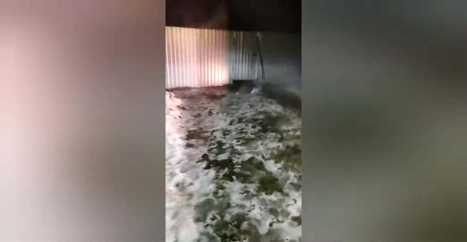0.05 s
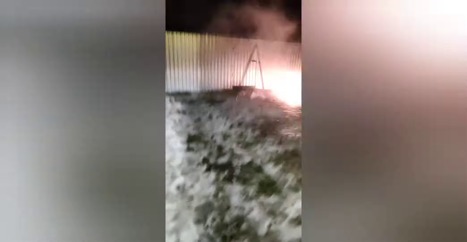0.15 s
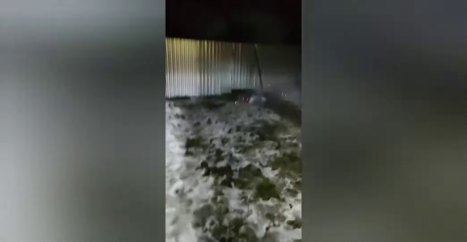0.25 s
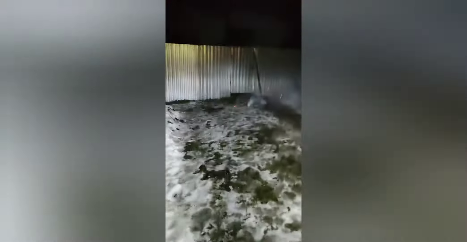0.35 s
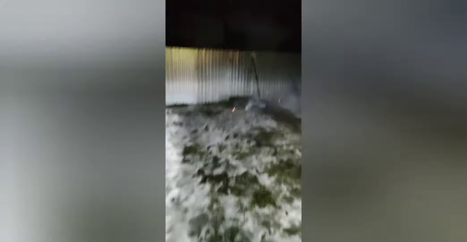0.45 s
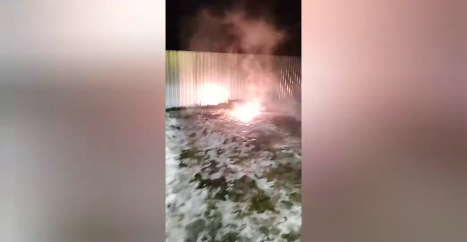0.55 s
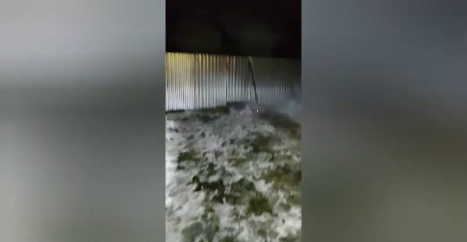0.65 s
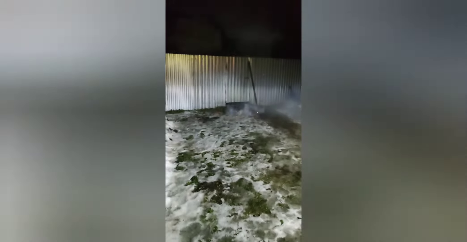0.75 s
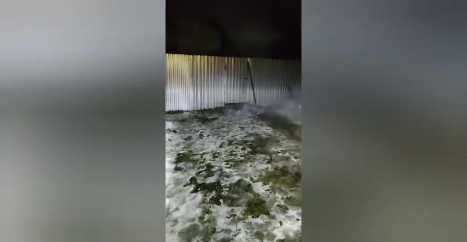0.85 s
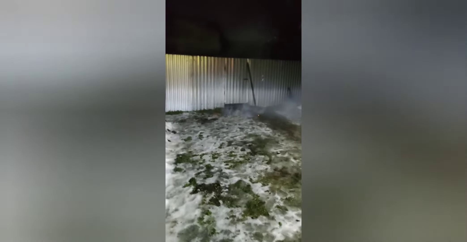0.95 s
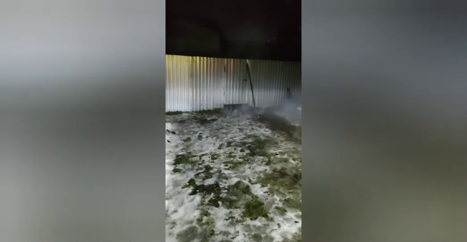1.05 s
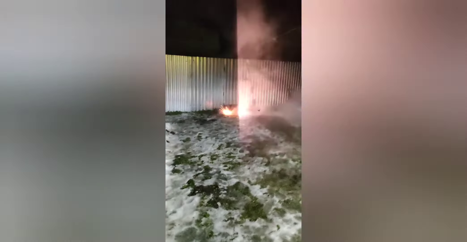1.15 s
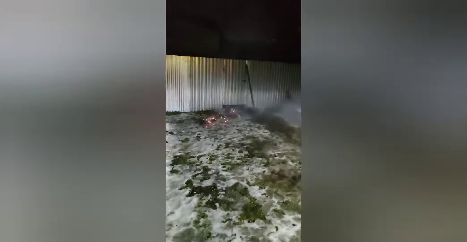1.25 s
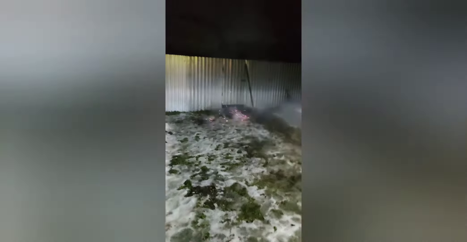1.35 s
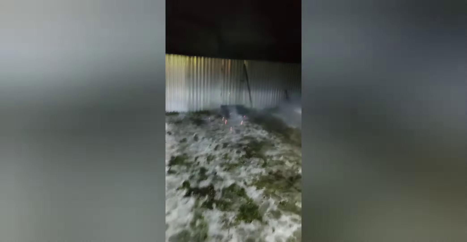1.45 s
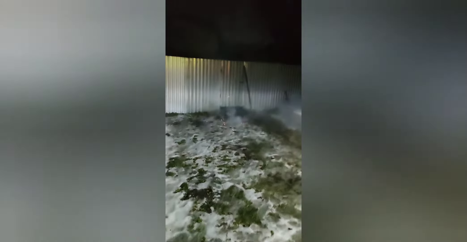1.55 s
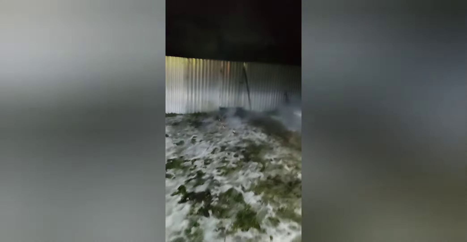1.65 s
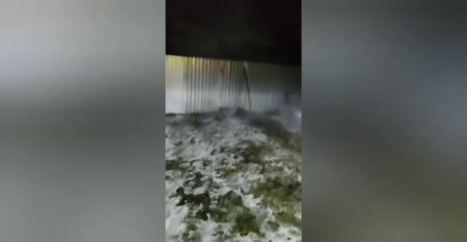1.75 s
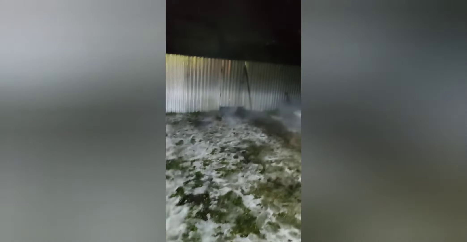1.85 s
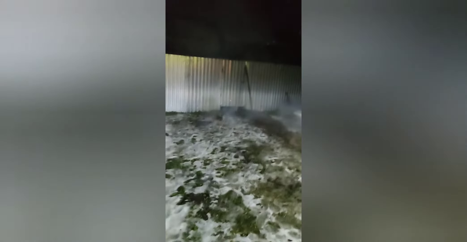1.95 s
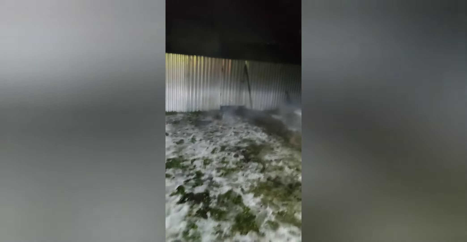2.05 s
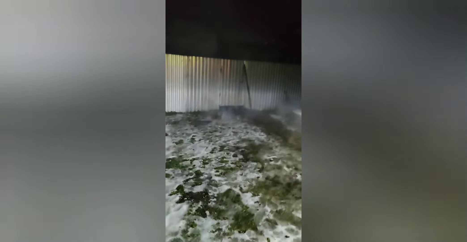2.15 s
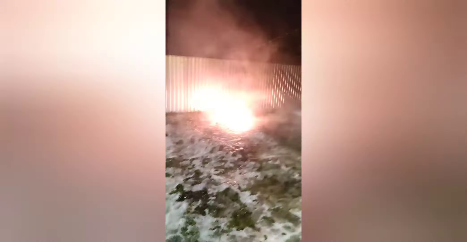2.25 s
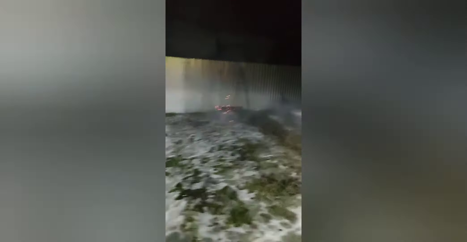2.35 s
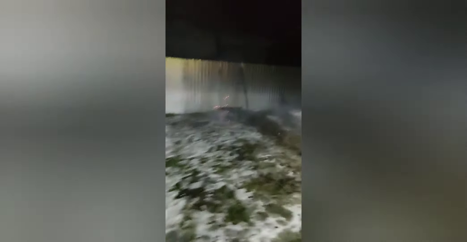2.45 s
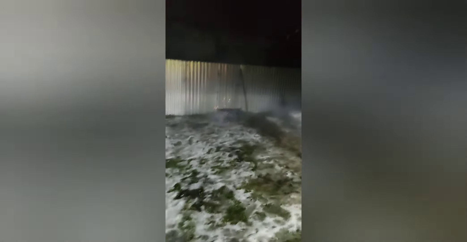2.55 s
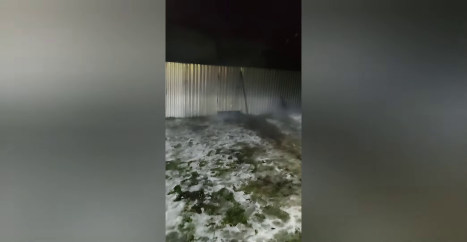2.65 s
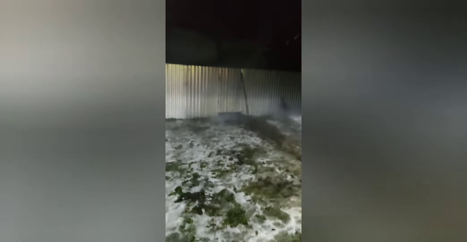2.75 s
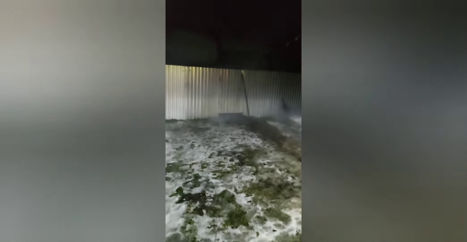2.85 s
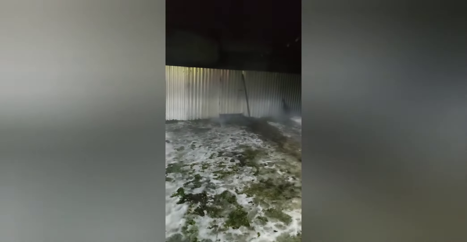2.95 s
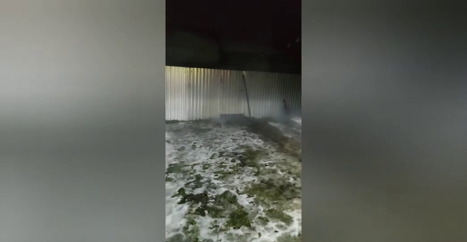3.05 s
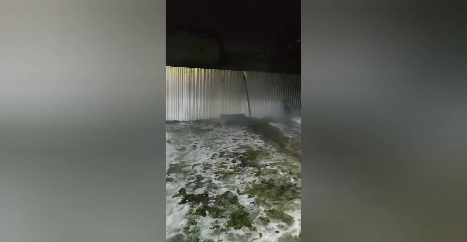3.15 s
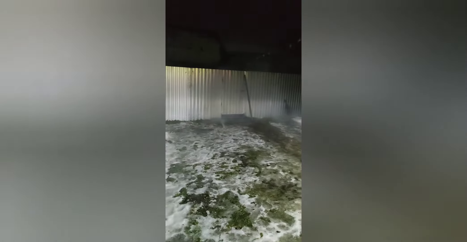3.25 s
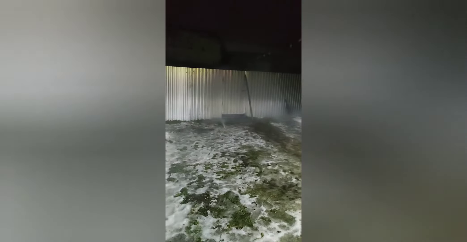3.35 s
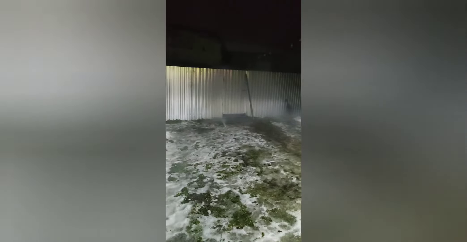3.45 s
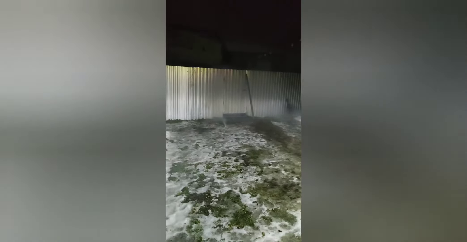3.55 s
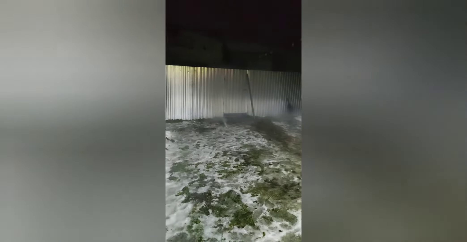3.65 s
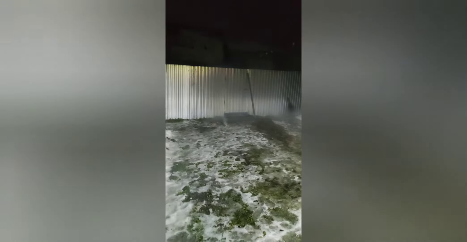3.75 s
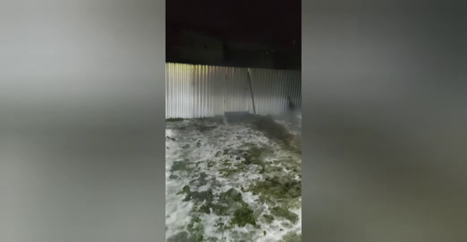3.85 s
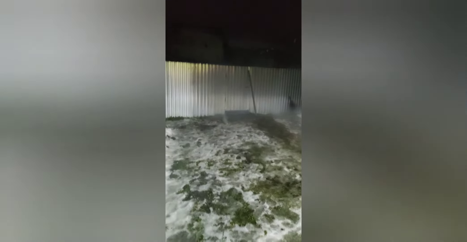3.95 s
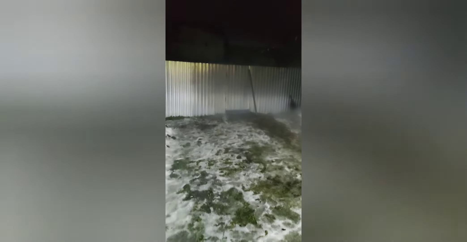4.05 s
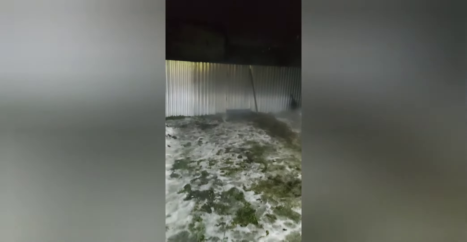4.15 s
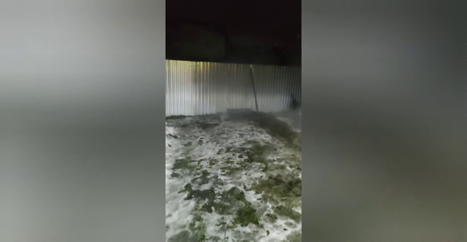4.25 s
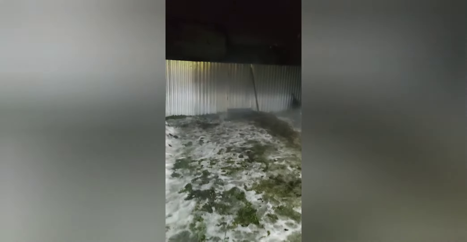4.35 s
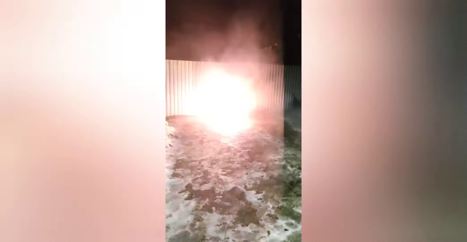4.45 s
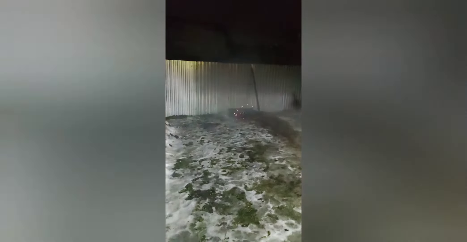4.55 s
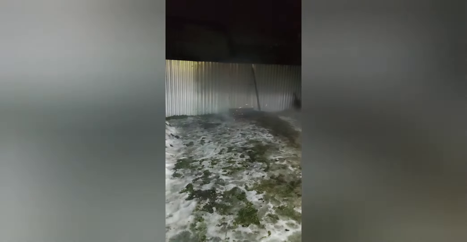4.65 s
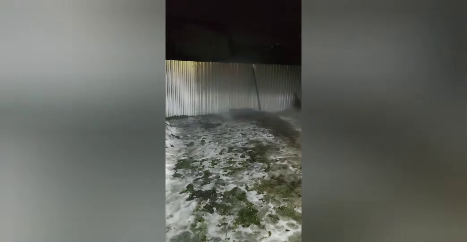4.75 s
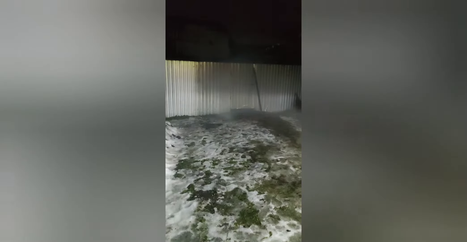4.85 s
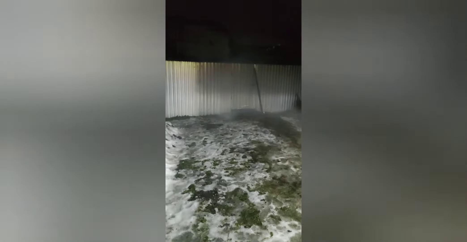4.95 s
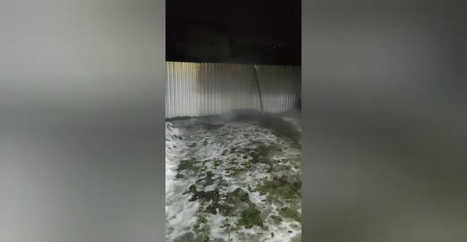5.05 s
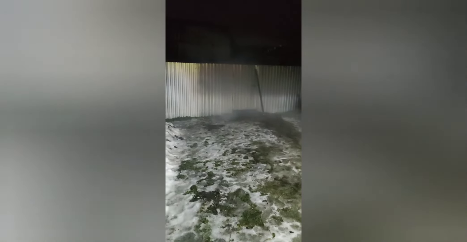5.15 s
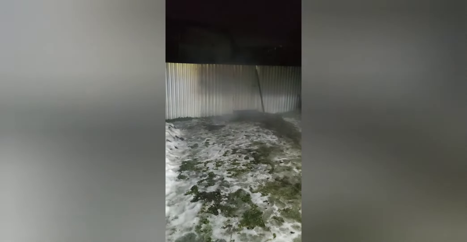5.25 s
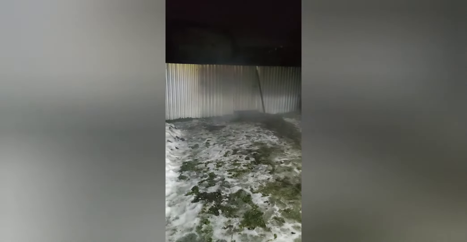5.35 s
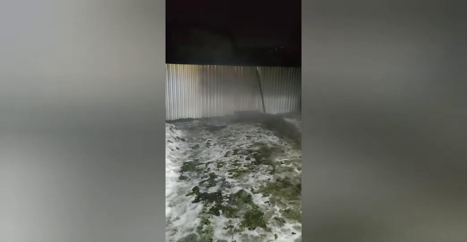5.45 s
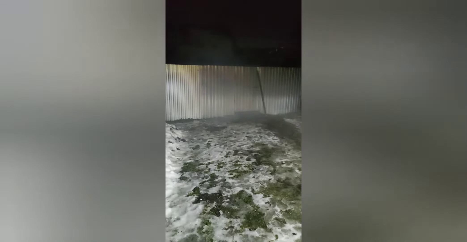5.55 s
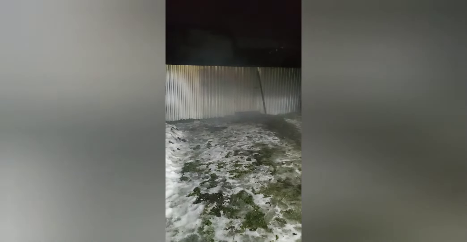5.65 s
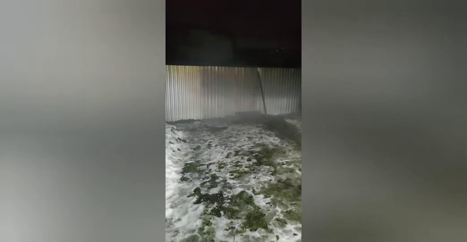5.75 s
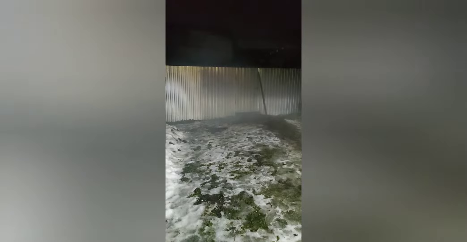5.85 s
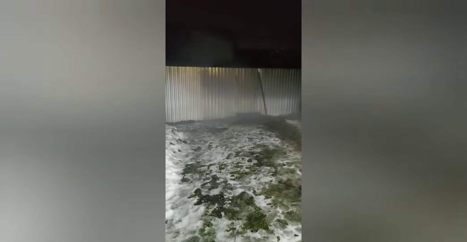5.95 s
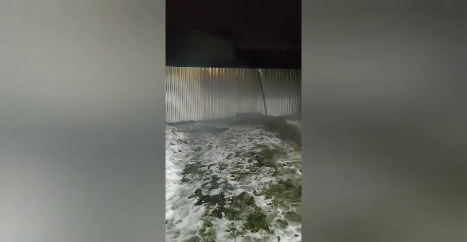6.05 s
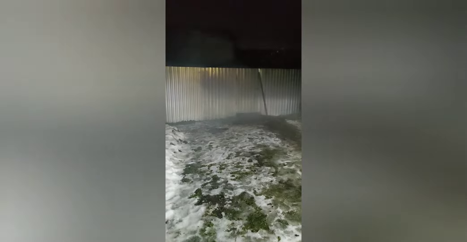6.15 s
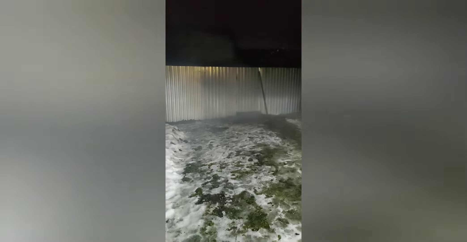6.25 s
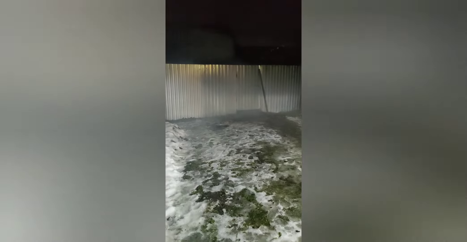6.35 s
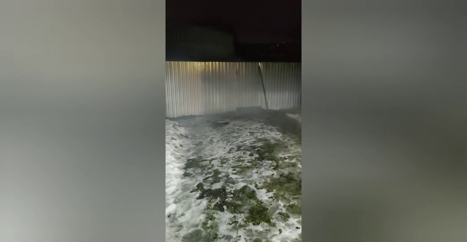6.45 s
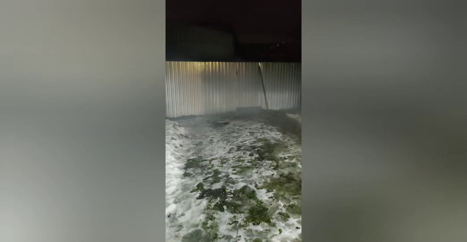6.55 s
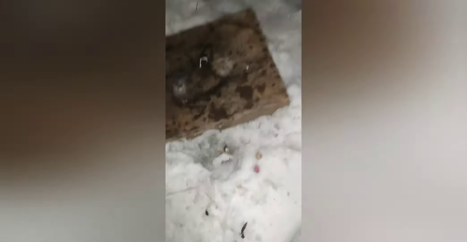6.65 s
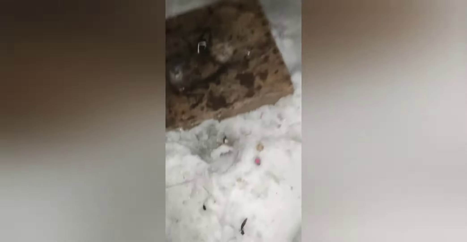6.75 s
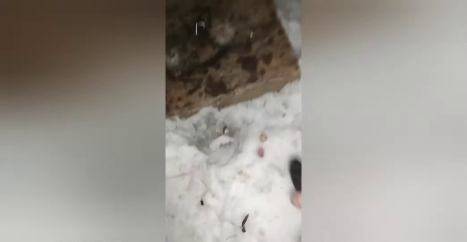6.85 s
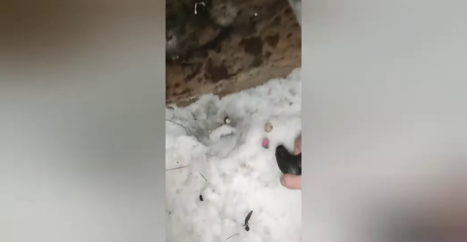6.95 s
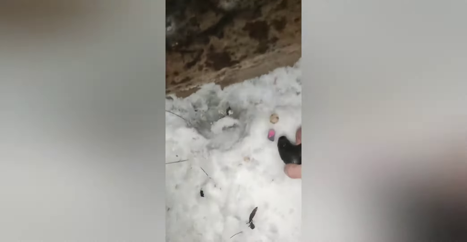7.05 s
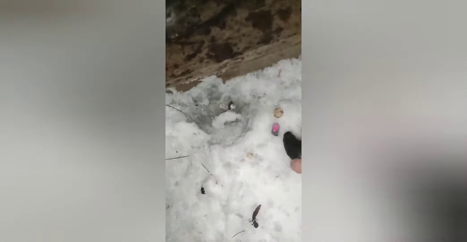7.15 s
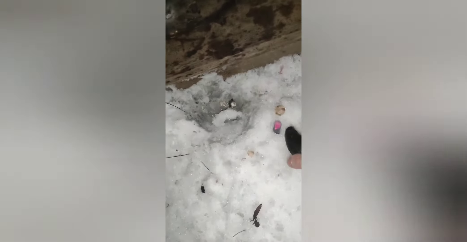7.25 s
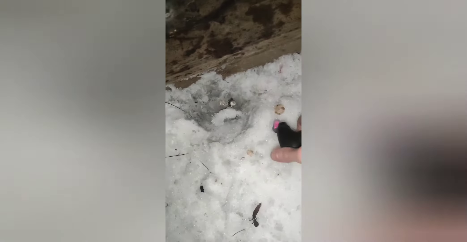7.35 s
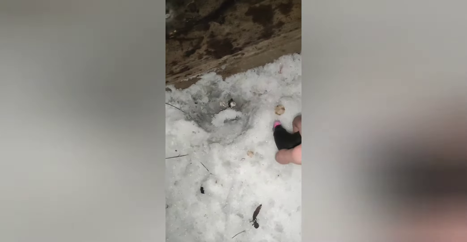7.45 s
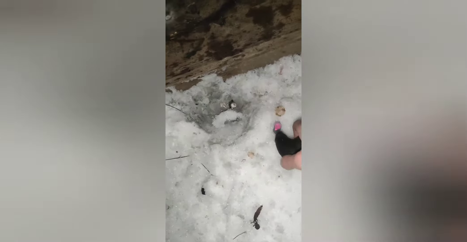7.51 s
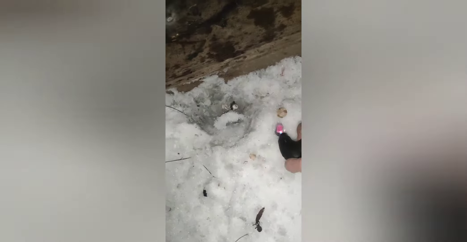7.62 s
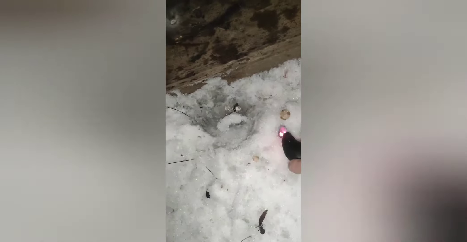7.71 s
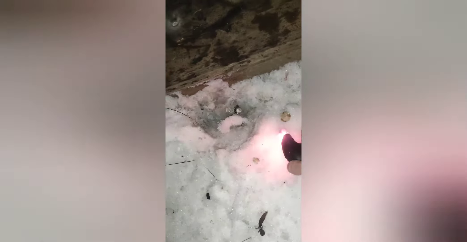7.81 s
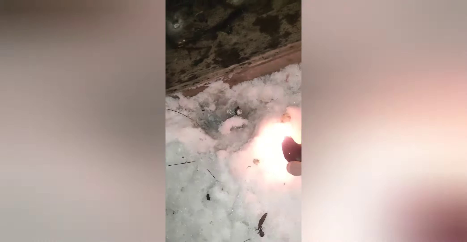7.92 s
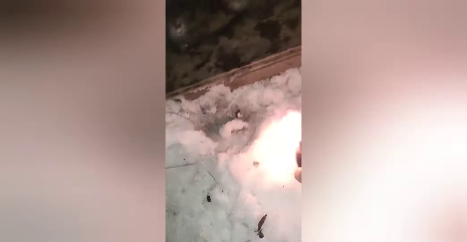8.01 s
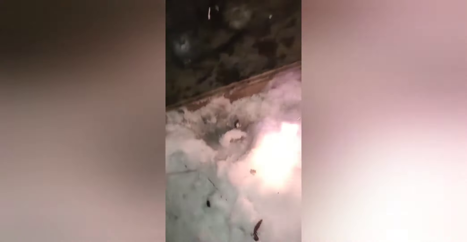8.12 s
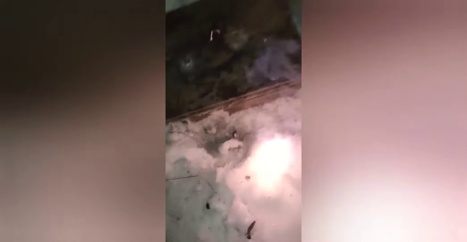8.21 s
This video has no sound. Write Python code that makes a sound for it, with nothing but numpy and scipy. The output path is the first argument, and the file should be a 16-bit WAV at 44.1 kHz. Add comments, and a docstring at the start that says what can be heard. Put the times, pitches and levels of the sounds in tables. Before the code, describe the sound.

Hard, clipped bangs come in a flurry, followed by one more and then another after a pause, with quick metallic reflections and a dull fading outdoor roll. Between them are quiet night air, grainy snow crunches and low wind buffeting. The scene switches suddenly to something close: soft rustling, a rattling lighter click, tiny finger taps, another click, then a steady sputtering hiss.

```python
"""Firecrackers go off in a snowy yard: shock waves crack, return from a metal fence, then from walls and far
houses, and roll away. Around the bangs snow crunches and air buffets the microphone, all of it noise bursts.
The yard then gives way to close air with a soft rustle. A lighter snaps in rattling noise, fingers tap, it
snaps again, its flame hisses louder until it holds steady, and a fuse catches, spitting in grainy bursts."""
import sys
import numpy as np
from scipy import signal
from scipy.fft import rfft, irfft, next_fast_len
from scipy.io import wavfile
from scipy.ndimage import uniform_filter1d, minimum_filter1d

SR = 44100
rng = np.random.default_rng(int(sys.argv[2]) if len(sys.argv) > 2 else 0)


def master(y):
    """Save y as 16-bit WAV."""
    cut = np.clip(np.atleast_2d(y).T, -1, 1)
    pcm = np.round(cut * 32767)  # scale
    wavfile.write(sys.argv[1], SR, pcm.astype(np.int16))


N = 365148
TIME = np.arange(N) / SR

# In every table of events, a rise is the time to swell by a factor e and t60 the time to die by 60 dB.
# Bangs: (time [s], charge [dB], crack [dB], openness of the spot [dB], fence echo lag [s],
#         near wall echo lag [s], houses' echo lag [s], pressure heave [dB], wall slaps [dB])
BANGS = [(0.127, -1, -6.5, -10.5, 0.0081, .138, .205, -47, -16),
         (0.2191, 0.5, -6, -10.5, 0.0074, .101, 0.23, -16.5, -11),
         (0.6048, 0, -2, -2, 0.0073, 0.12, 0.24, -29, 0.5),
         (1.1974, -1, -3, -3, .0045, .112, .25, -31, -10),
         (1.2515, -12.5, -8, -11, .0070, .112, 0.21, -40, -22),
         (1.3400, 0.5, -5.5, -2, 0.0082, .108, .24, -23, -2),
         (2.3043, -0.5, -2, 0, 0.0082, .1164, .243, -25.5, -0.5),
         (4.5161, 0, 0, -1.5, 0.0069, 0.11, .2565, -22, -1.5)]
# Sharp pops among the echoes, the first adding to the near wall slap of the first bang: (time [s], level [dB])
SHARP_POPS = [(.2651, -9), (.4856, -14), (1.9952, -17.5)]
# Lighter clicks: (time [s], level [dB], rise [s], t60 [s])
LIGHTER_CLICKS = [(7.078, -9, 0.0015, 0.018), (7.09, -36.5, 0.0035, 0.076), (7.6241, -8, 0.00085, 0.013)]
# Fingers tapping the cracker: (time [s], level [dB])
FINGER_TAPS = [(7.357, -47), (7.368, -44), (7.463, -39)]
# Spits of the fuse: (time [s], level [dB], rise [s], t60 [s])
FUSE_SPITS = [(7.942, -23.5, 0.0095, 0.056), (8.021, -27.5, 0.0037, 0.066), (8.059, -37.5, 0.0041, 0.063),
              (8.147, -42, 0.013, 0.18), (8.272, -33, 0.012, 0.08)]
# Crunches of snow, and just before the 2.30 s bang a fuse flaring: (time [s], level [dB], t60 [s])
SNOW_CRUNCHES = [(0.063, -44, 0.44), (0.093, -40.5, 0.23), (1.736, -36, 0.12), (2.232, -35.5, 0.22),
                 (3.259, -46.5, 0.12), (3.751, -45.5, 0.21), (4.129, -48.5, 0.2), (5.464, -48.5, 0.09),
                 (5.749, -52, 0.19), (5.867, -49.5, 0.13), (6.246, -52, 0.16)]
# Gusts over the light breeze: (time [s], level [dB], rise [s], t60 [s])
GUSTS = [(2.15, -49.5, 0.2, .6), (2.85, -65, 0.12, 4), (3.68, -55, 0.028, 1.4), (5.919, -45, 0.085, 1.32),
         (6.55, -60, .12, 1)]
# Puffs of the strongest eddies on the ports: (time [s], level [dB])
PUFFS = [(3.639, -49), (3.737, -50), (3.83, -48), (3.976, -48), (5.228, -52), (6.072, -36.5), (6.217, -46),
         (6.5, -49), (6.524, -45), (6.612, -48)]

# Noise colours, each scaled to rms 1 when used: (frequency [Hz], relative level per Hz [dB])
# Splash behind each crack
CRACK_COLOUR = [(35, -39), (60, -6), (903, -6.5), (1950, 1.5), (2770, -7.5), (4750, -5), (6280, -11.5),
                (7570, -22.5), (9130, -18.5), (12700, -21.5), (14900, -24.5), (16000, -33)]
# Bright rasp of the near scatter: (frequency [Hz], relative level per Hz [dB])
RASP_COLOUR = [(400, -11.5), (900, -2.5), (1400, -8.5), (2100, 1), (2600, -6), (3500, -4.5), (4700, -11),
               (6500, -8.5), (7600, -20), (13500, -26.5), (16000, -39)]
# Hollow body of the near scatter: (frequency [Hz], relative level per Hz [dB])
BODY_COLOUR = [(60, -17), (160, -13.5), (300, -6.5), (450, -1), (570, -7), (880, -1.5), (1200, -2),
               (1700, -16.5)]
# Echoes off the walls: (frequency [Hz], relative level per Hz [dB])
WALL_COLOUR = [(71, -55.5), (120, -25), (204, -27), (513, -11), (874, -10.5), (1190, -5.5), (1720, -6.5),
               (1860, -7), (2200, -6.5), (3310, -14), (4410, -12.5), (6500, -17), (16000, -58.5)]
# Echoes off the far houses: (frequency [Hz], relative level per Hz [dB])
HOUSE_COLOUR = [(71, -56.5), (120, -36.5), (196, -17.5), (418, -8), (712, -10.5), (930, -4), (1290, -4.5),
                (1400, -5.5), (1980, 0), (2810, -7.5), (6370, -15), (7500, -30), (9990, -36.5),
                (16000, -68)]
# Dull lingering roll: (frequency [Hz], relative level per Hz [dB])
ROLL_COLOUR = [(71, -31), (120, -15), (272, -14.5), (301, -6.5), (555, -5.5), (604, -1.5), (1390, -2),
               (3370, -14.5), (3990, -19), (7000, -27.5), (9100, -56.5), (15400, -120)]
# Deep rumble and thumps of the blast: (frequency [Hz], relative level per Hz [dB])
BLAST_COLOUR = [(12, -7.5), (30, -1.0), (60, -8.0), (120, -20), (250, -30.5)]
# Snap of the lighter: (frequency [Hz], relative level per Hz [dB])
LIGHTER_COLOUR = [(88, -61), (150, -43.5), (321, -16.5), (578, -54.5), (979, -15.5), (1420, -29),
                  (1870, -7.5), (2700, -23.5), (3490, -18.5), (4490, -5.5), (6020, -1.5), (6910, 1),
                  (8400, -20.5), (10000, -12.5), (16000, -28)]
# Tap of a finger: (frequency [Hz], relative level per Hz [dB])
TAP_COLOUR = [(300, -28), (1100, -16), (1700, 10), (2400, -7), (3500, -11), (7000, -29), (15000, -38)]
# Hiss of the lighter's gas flame: (frequency [Hz], relative level per Hz [dB])
FLAME_COLOUR = [(150, -15), (300, -8.5), (1200, -5.5), (2100, -1.5), (3000, -14.5), (4500, -2), (6500, -3.5),
                (7800, -15.5), (12000, -21), (16000, -30)]
# Spit of the fuse: (frequency [Hz], relative level per Hz [dB])
SPIT_COLOUR = [(41, -35), (70, -12), (262, 7), (872, 0), (2170, -4), (3190, -8.5), (5500, -2), (10400, -19),
               (11900, -32), (14300, -18), (16000, -38)]
# Crunching snow: (frequency [Hz], relative level per Hz [dB])
SNOW_COLOUR = [(150, -33.5), (250, 2), (748, 0), (1150, -6), (1560, -1), (2950, -5), (3940, -7),
               (4300, -8.5), (5850, -1), (7560, -16), (15000, -34.5)]
# Air buffeting the ports: (frequency [Hz], relative level per Hz [dB])
BUFFET_COLOUR = [(12, -50), (20, -0.5), (65, 3), (128, -2.5), (163, -5.5), (252, -7), (296, -13.5),
                 (500, -24.5), (650, -29.5), (1100, -120)]
# Quiet night air: (frequency [Hz], relative level per Hz [dB])
NIGHT_COLOUR = [(15, -39.5), (25, -1.5), (87, -21.5), (137, 7), (166, -17), (591, 1.5), (641, -7.5),
                (754, -1), (1330, -8), (1610, -18), (3250, -19), (16000, -23.5)]
# Soft hiss and still air close by: (frequency [Hz], relative level per Hz [dB])
CLOSE_AIR_COLOUR = [(24, -32), (40, -13), (53, -13), (85, -23.5), (283, -3.5), (467, -5), (529, -2.5),
                    (570, -5.5), (942, -6.5), (2050, -7), (2630, -10.5), (6330, -6), (7730, -18.5),
                    (16000, -28)]
# Faint rumble under the rustle: (frequency [Hz], relative level per Hz [dB])
RUSTLE_RUMBLE_COLOUR = [(15, 13), (40, -16.0), (100, -16.0), (200, -29)]

# Ring of single reflections: (frequency [Hz], width [Hz], relative level [dB])
REFLECTION_RINGS = [(765, 500, -1), (1170, 500, -2), (1755, 800, -1.5), (2080, 780, 0), (3580, 1000, 0)]
# Far echoes die at a different pace in each band: (frequency [Hz], t60 [s])
HOUSES_T60 = [(150, 0.51), (600, 0.99), (1800, 0.86), (4500, .8), (8000, 0.75), (14000, 0.43)]
# Likeness of the two channels: (frequency [Hz], correlation [-1 to 1])
LIKENESS = [(40, 0.076), (150, 0.3), (600, 0.27), (1500, 0.4), (4000, 0.32), (12000, 0.1)]
# Left over right in the yard, at a full lean: (frequency [Hz], level difference [dB])
LEAN = [(100, -3), (500, -0.5), (1100, -1.5), (2000, 6.5), (4000, 0), (10000, -1)]

FAR_WALL_LAG_S = .1505  # the same for every bang
PORT_LAG_S = .0001
NIGHT_DB, BREEZE_DB, YARD_END_S = -66, -82.5, 6.625
RUSTLE_S, RUSTLE_DB, RUSTLE_RISE_S, RUSTLE_T60_S, STILL_AIR_DB = 6.83, -49, 0.066, 2.1, -75.5
FLAME_ON_S, FLAME_START_DB, FLAME_GROWTH_DB_PER_S, FLAME_FULL_DB = 7.633, -56.5, 35, -43.5
CUTOFF_HZ = 16000


def cracks(fence_db=-1, splash_db=-8, splash_t60=0.038, ring_left_db=7, ring_right_db=-4,
           body_left_db=-5, body_right_db=-1, overload_db=1):
    """Each shock and its fence echo ring the ports, splash briefly and flatten against the microphone's limit."""
    s, _, crack_db, _, fence_lag = np.transpose(BANGS)[:5]
    times = np.r_[s, s + fence_lag]
    db = np.r_[crack_db, crack_db + fence_db]
    wave = filtered(shocks(times, db, length_s=.0014), "band", [200, 4500], order=1)
    ring = resonance(wave, hz=1650, width_hz=320)
    left = from_db(body_left_db) * wave + from_db(ring_left_db) * ring
    right = from_db(body_right_db) * wave + from_db(ring_right_db) * ring
    splash = noise(CRACK_COLOUR, lean=1) * bursts(times, db + splash_db, rise=.0004, t60=splash_t60)
    limit = from_db(overload_db)
    return limit * np.tanh((ports(left, right) + splash) / limit)


def near_scatter(rasp_db=-14.5, rasp_follows=.4, body_db=-14, shed_lag=0.032, shed_db=-6):
    """Ground, fence ribs and nearest building scatter the shock: rasp over hollow body, fullest in the open."""
    s, charge_db, _, open_db, fence_lag = np.transpose(BANGS)[:5]
    db = rasp_db + rasp_follows * (charge_db + open_db)
    ground = bursts(s + fence_lag, db, rise=0.0011, t60=0.23)
    shed = bursts(s + shed_lag, db + shed_db, rise=0.002, t60=0.14)
    rasp = noise(RASP_COLOUR, lean=0.34) * np.hypot(ground, shed)
    body = noise(BODY_COLOUR) * bursts(s + fence_lag, body_db + open_db, rise=.002, t60=0.23)
    return (rasp + body) * flicker(per_s=670, depth_db=-1.6)


def slaps(near_wall_db=-8, far_wall_db=0, fence_db=-4, splash_db=-17):
    """Two flat walls throw back each shock and its fence echo as hard slaps; a few further pops sound alike."""
    s, fence_lag, wall_lag, slap_db = np.transpose(BANGS)[[0, 4, 5, 8]]
    walls = [(wall_lag, near_wall_db), (FAR_WALL_LAG_S, far_wall_db)]
    paths = walls + [(lag + fence_lag, db + fence_db) for lag, db in walls]
    arrivals = [np.c_[s + lag, slap_db + db] for lag, db in paths]
    times, db = np.vstack(arrivals + [SHARP_POPS]).T
    wave = shocks(times, db, length_s=.0005)
    ringing = 0.9 * resonance(wave, hz=1660, width_hz=1800) + 0.27 * wave
    slap = filtered(ringing, "low", 4500)
    splash = noise(WALL_COLOUR, lean=0.94) * bursts(times, db + splash_db, rise=0.00025, t60=0.022)
    return ports(slap, slap) * pan(left_db=1.0) + splash


def wall_echoes(clump_db=-23.0, grain_db=-6):
    """A clump of echoes from around the yard, its level following the charge."""
    s, charge_db = np.transpose(BANGS)[:2]
    swell = bursts(s + FAR_WALL_LAG_S, clump_db + charge_db, rise=.035, t60=.45)
    grains = from_db(grain_db) * reflections(per_s=40, size_db=3.5)
    return via_fence((noise(WALL_COLOUR, lean=0.91) + grains) * swell)


def far_echoes(houses_db=-23.5, roll_db=-20.5, roll_lag=0.45, roll_t60=3.4, grain_db=-6):
    """Far houses answer a moment later; air takes the upper treble first, and a dull roll lingers."""
    s, charge_db, lag = np.transpose(BANGS)[[0, 1, 6]]
    db = houses_db + charge_db
    wash = noise(HOUSE_COLOUR, lean=0.74) * flicker(per_s=280, depth_db=0.5)
    grains = from_db(grain_db) * reflections(per_s=50, size_db=1) * pan(left_db=1)
    spectrum = rfft(wash + grains, next_fast_len(N, real=True))
    hz = np.linspace(0, SR / 2, spectrum.shape[1])
    roll_swell = bursts(s + roll_lag, db + roll_db, rise=.08, t60=roll_t60)
    out = noise(ROLL_COLOUR, lean=0.98) * roll_swell * flicker(per_s=25, depth_db=2.0)
    # overlapping bands, each with its own decay
    centres, t60s = np.transpose(HOUSES_T60)
    for share, t60 in zip(np.eye(len(centres)), t60s):
        band = irfft(spectrum * at_hz(np.c_[centres, share], hz))[:, :N]
        out += band * bursts(s + lag, db, rise=0.0018, t60=t60)
    return via_fence(out)


def heave(swing_t60=1.5, rumble_db=-19, direct_db=-17, wall_db=-5, houses_db=-9):
    """The blast jolts the microphone into a slow swing and deep rumble; shock and main echoes each thump."""
    s, _, _, open_db, fence_lag, wall_lag, houses_lag, db, _ = np.transpose(BANGS)
    jolts = np.zeros(N)
    jolts[(s * SR).astype(int)] = from_db(db)
    turn = 2 * np.pi * 3.6 / SR  # a 3.6 Hz swing
    pole = from_db(-60 / (swing_t60 * SR)) * np.exp(1j * turn)
    swing = signal.lfilter([1], [1, -pole], jolts).real
    rumble = bursts(s + .015, db + rumble_db, rise=0.0034, t60=1.6)
    arrivals = np.r_[s + fence_lag, s + wall_lag, s + houses_lag]
    thump_db = np.r_[direct_db + 2 * open_db, db + wall_db, db + houses_db]
    thumps = bursts(arrivals, thump_db, rise=0.001, t60=0.077)
    deep = noise(BLAST_COLOUR) * np.hypot(rumble, thumps)
    return (filtered(swing, "low", 160) + deep) * pan(left_db=-2.0)


def lighter():
    """The trigger snaps in a fast bright rattle; fingers tap."""
    s, db, rise, t60 = np.transpose(LIGHTER_CLICKS)
    rattle = bursts(s, db, rise, t60) * flicker(per_s=2500, depth_db=4.0)
    snap = noise(LIGHTER_COLOUR) * rattle * pan(left_db=-0.5)
    taps = noise(TAP_COLOUR) * bursts(*np.transpose(FINGER_TAPS), rise=0.00043, t60=0.013)
    return snap + taps


def fuse():
    """The lighter's gas flame hisses, growing until the level holds, and the catching fuse spits in short
    grainy bursts."""
    s, db, rise, t60 = np.transpose(FUSE_SPITS)
    spits = noise(SPIT_COLOUR) * bursts(s, db, rise, t60) * flicker(per_s=2700, depth_db=0.5)
    age = TIME - FLAME_ON_S
    flame_db = np.minimum(FLAME_START_DB + FLAME_GROWTH_DB_PER_S * age, FLAME_FULL_DB)
    flame = from_db(flame_db) * (age > 0)
    hiss = noise(FLAME_COLOUR) * flame * flicker(per_s=500, depth_db=2.0)
    return (spits + hiss) * pan(left_db=2.0)


def crunching_snow():
    """Packed snow gives way in short grainy bursts of noise; one burst is a fuse flaring before a bang."""
    s, db, t60 = np.transpose(SNOW_CRUNCHES)
    return noise(SNOW_COLOUR) * bursts(s, db, rise=0.0075, t60=t60) * flicker(per_s=260, depth_db=4.0)


def squeak(s=5.757, db=-57):
    """One faint short squeak, as of packed snow: noise through a narrow resonance."""
    tone = resonance(rng.standard_normal((2, N)), hz=2330, width_hz=130)
    return tone / tone.std() * bursts(s, db, rise=.008, t60=.22)


def wind():
    """Breeze, gusts and single puffs buffet the ports in lumps."""
    puffs = bursts(*np.transpose(PUFFS), rise=0.0057, t60=0.056)
    flow = from_db(BREEZE_DB) + bursts(*np.transpose(GUSTS))
    lumps = flicker(per_s=90, depth_db=4.5)
    return noise(BUFFET_COLOUR) * np.hypot(flow * lumps, puffs) * pan(left_db=10.0)


def rustle(rumble_db=-59, rumble_rise_s=.17, rumble_t60=1.1):
    """Close by, a soft hiss over a faint rumble swells and settles into still air."""
    swell = bursts(RUSTLE_S, RUSTLE_DB, RUSTLE_RISE_S, RUSTLE_T60_S)
    hiss = noise(CLOSE_AIR_COLOUR) * np.hypot(swell, from_db(STILL_AIR_DB))
    rumble = noise(RUSTLE_RUMBLE_COLOUR) * bursts(RUSTLE_S, rumble_db, rumble_rise_s, rumble_t60)
    return (hiss + rumble) * np.clip((TIME - YARD_END_S) / .04, 0, 1)


def night_air():
    """Steady quiet noise, with a dull wash that dies away at the start."""
    opening_wash = noise(ROLL_COLOUR) * bursts(0, db=-48.5, rise=.01, t60=0.7)
    return opening_wash + from_db(NIGHT_DB) * noise(NIGHT_COLOUR)


def yard_background():
    """Snow, wind and night air sound together and fade out within milliseconds where the yard ends."""
    fade = np.clip((YARD_END_S - TIME) / 0.0072, 0, 1)
    return (crunching_snow() + wind() + night_air()) * fade


def noise(spectrum, lean=0):
    """Stereo noise of a given colour, partly alike in both channels, the left a little late; rms 1."""
    size = next_fast_len(N, real=True)
    hz = np.arange(size // 2 + 1) * SR / size
    mid, side = rng.standard_normal((2, len(hz))) + 1j * rng.standard_normal((2, len(hz)))
    alike = np.clip(at_hz(LIKENESS, hz), -1, 1)
    sign = np.array([[1], [-1]])  # left, right
    # beyond both ends of the table the level falls away
    below = np.minimum(hz / spectrum[0][0], 1) ** 2
    above = np.minimum(spectrum[-1][0] / np.maximum(hz, 1), 1) ** 2
    gain = from_db(at_hz(spectrum, hz) + sign * lean * at_hz(LEAN, hz) / 2) * below * above
    pair = np.sqrt(1 + alike) * mid + np.sqrt(1 - alike) * sign * side
    x = ports(*irfft(gain * pair, size)[:, :N])
    return x / x.std()


def bursts(times, db, rise, t60):
    """Envelope of events that swell up to their time and then die; their powers add."""
    power = np.zeros(N)
    for s, d, up, down in zip(*np.broadcast_arrays(np.atleast_1d(times), db, rise, t60)):
        span = slice(*np.searchsorted(TIME, [s - 10 * up, s + 2 * down]))
        age = TIME[span] - s
        log_gain = np.minimum(age / up, -np.log(1000) * age / down)
        power[span] += from_db(d) ** 2 * np.exp(2 * log_gain)
    return np.sqrt(power)


def shocks(times, db, length_s):
    """N-shaped pressure waves: a jump up, a straight fall, a jump back."""
    out = np.zeros(N)
    wave = np.linspace(1, -1, max(int(length_s * SR), 3))
    for s, d in zip(times, db):
        start = int(s * SR)
        out[start:start + len(wave)] += from_db(d) * wave
    return out


def reflections(per_s, size_db, dull_hz=4000):
    """Separate little echoes arrive at random, varied in strength and colour, dulled by the air; rms 1."""
    out = 0
    for hz, width_hz, db in REFLECTION_RINGS:
        chance = rng.random(N) * SR / per_s
        at = np.flatnonzero(chance < 1)
        polarity = (-1.) ** at
        arrivals = np.zeros(N)
        arrivals[at] = polarity * from_db(size_db * np.minimum(-np.log(chance[at]), 2))
        ring = resonance(arrivals, hz, width_hz)
        out = out + from_db(db) * ring / (ring.std() + 1e-9)
    out = filtered(out, "low", dull_hz, order=4)
    return ports(out, out) / out.std()


def flicker(per_s, depth_db):
    """A gain of mean power 1 that glides to a new random level per_s times a second."""
    steps = np.clip(rng.standard_normal(N // 4), -2, 2)
    gain = from_db(depth_db * np.interp(TIME * per_s, np.arange(len(steps)), steps))
    return gain / np.sqrt(np.mean(gain ** 2))


def resonance(x, hz, width_hz):
    """One resonance with a gain of about 1 on top."""
    r = np.exp(-np.pi * width_hz / SR)
    feed = np.array([1, 0, -1]) * (1 - r * r) / 2
    feedback = [1, -2 * r * np.cos(2 * np.pi * hz / SR), r * r]
    return signal.lfilter(feed, feedback, x + 1e-18)


def filtered(x, kind, hz, order=2):
    """Causal Butterworth filter."""
    sos = signal.butter(order, np.clip(hz, 2, .45 * SR), kind, fs=SR, output="sos")
    return signal.sosfilt(sos, x + 1e-18)


def via_fence(x, lag_s=0.0072, share=0.065):
    """Every echo also arrives by way of the fence, which combs its spectrum."""
    return x + share * delayed(x, lag_s)


def ports(left, right):
    """The sound reaches the left port a little later."""
    return np.array([delayed(left, PORT_LAG_S), right])


def delayed(x, lag_s):
    """The same sound a whole number of samples later."""
    lag = int(np.clip(lag_s * SR, 1, N - 1))
    return np.concatenate([np.zeros_like(x[..., :lag]), x[..., :-lag]], axis=-1)


def pan(left_db):
    """Channel gains that set the left above the right by left_db."""
    return from_db(np.array([[.5], [-.5]]) * left_db)


def at_hz(points, hz):
    """Read a table on a log-frequency axis."""
    f, value = np.transpose(points)
    return np.interp(np.log(np.maximum(hz, 1)), np.log(f), value)


def from_db(db):
    """Decibels to gain."""
    return 10 ** (np.asarray(db) / 20)


def limiter(x, ceiling_db=1, release_db_per_s=300):
    """The gain drops just ahead of each overload and recovers quickly."""
    level_db = 20 * np.log10(np.abs(x).max(axis=0) + 1e-9)
    over = np.maximum(level_db - ceiling_db, 0)
    ahead = int(.009 * SR)
    held = -minimum_filter1d(-over, ahead, origin=-(ahead // 2))
    ramp = release_db_per_s * TIME
    reduction_db = np.maximum.accumulate(held + ramp) - ramp
    return x * from_db(-uniform_filter1d(reduction_db, ahead // 2))


def scene():
    """Bangs with their echoes, the yard, then the lighting of a fuse."""
    bangs = cracks() + near_scatter() + slaps() + wall_echoes() + far_echoes() + heave()
    return bangs + lighter() + fuse() + squeak() + rustle() + yard_background()


def record(dry):
    """A limiter holds the shocks down, their peaks are rounded and the top is cut."""
    top = 1.1
    rounded = top * np.tanh(limiter(dry) / top)
    return signal.sosfilt(signal.ellip(10, .1, 80, CUTOFF_HZ, fs=SR, output="sos"), rounded)


dry = scene()
out = record(dry)
master(out)
```